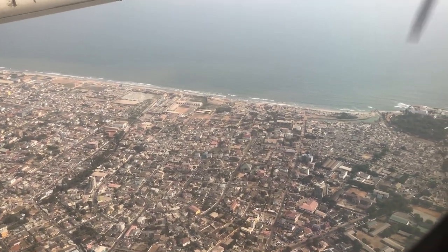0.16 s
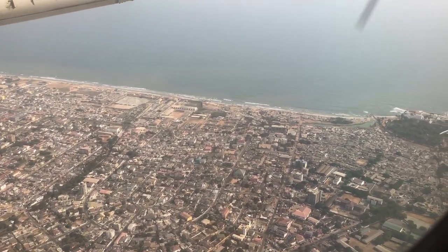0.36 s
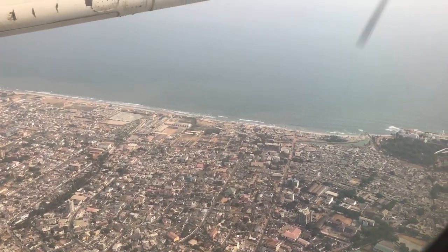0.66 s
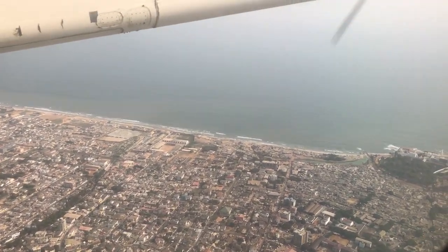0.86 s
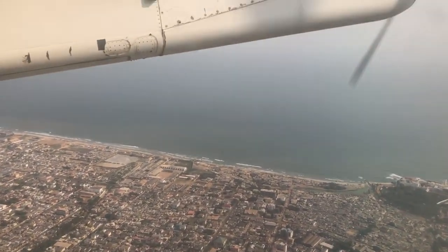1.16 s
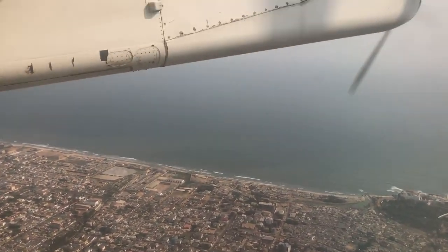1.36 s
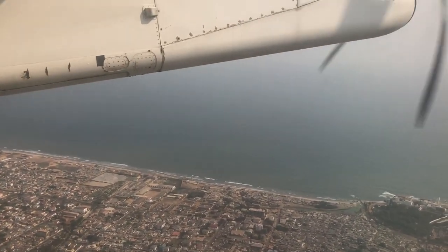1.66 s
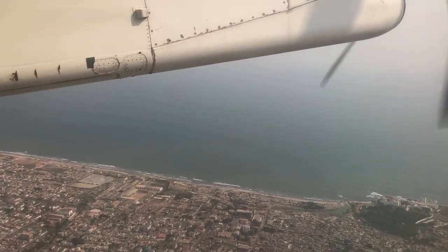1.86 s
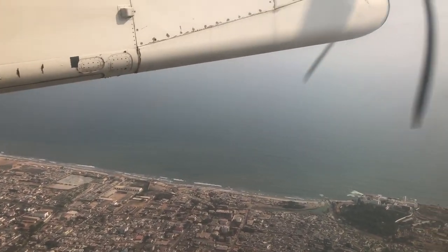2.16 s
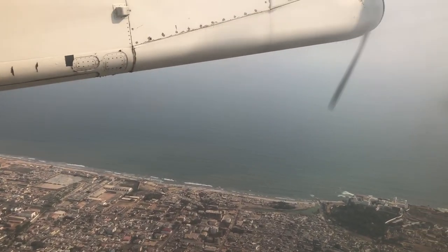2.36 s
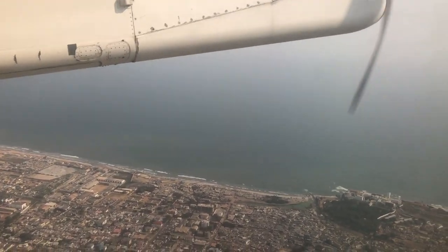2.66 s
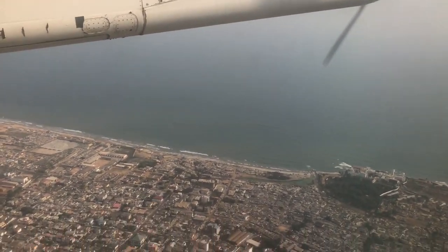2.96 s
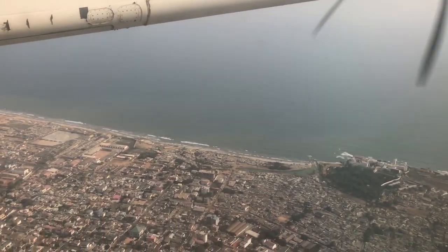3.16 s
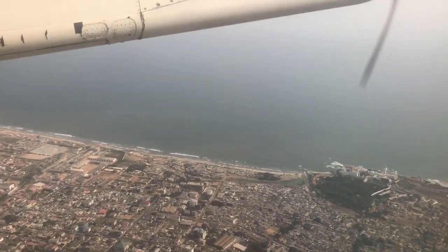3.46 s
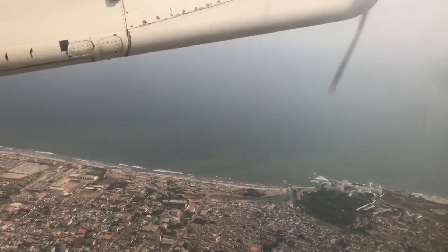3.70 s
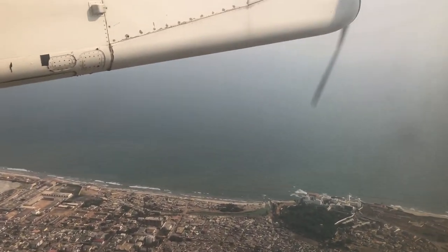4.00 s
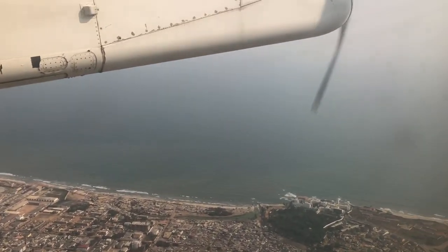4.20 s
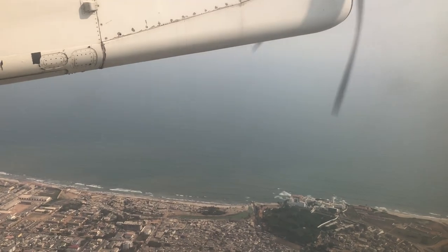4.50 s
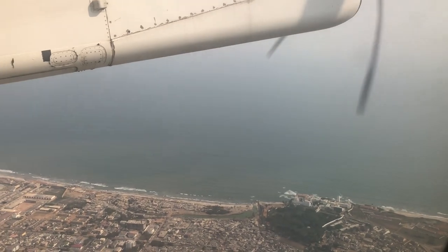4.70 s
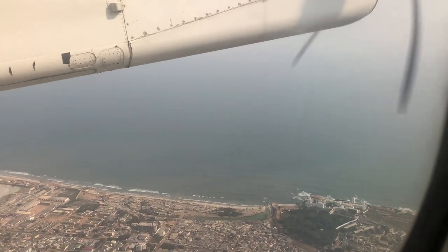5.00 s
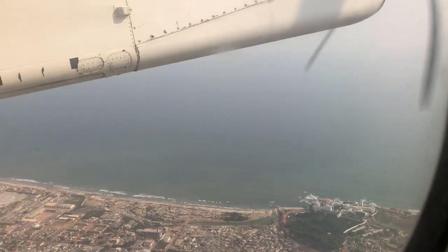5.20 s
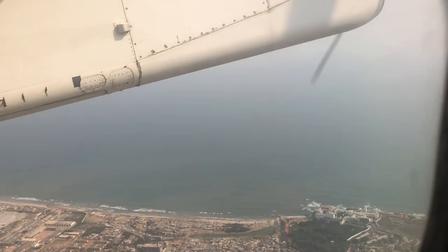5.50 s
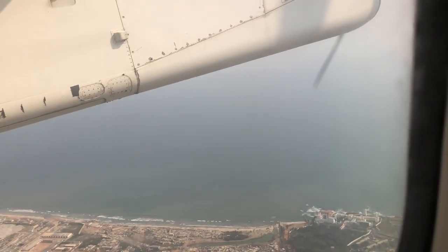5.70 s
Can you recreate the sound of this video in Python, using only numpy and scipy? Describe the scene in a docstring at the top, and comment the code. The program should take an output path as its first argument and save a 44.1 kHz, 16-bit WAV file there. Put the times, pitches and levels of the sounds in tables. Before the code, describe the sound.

Propeller aircraft cabin hum, low and throbbing at first, then thinner and brighter as slipstream roar swells near the window.

```python
"""A propeller drone fills a turboprop cabin at a window seat, winding down a little: blade harmonics, near and far.
The microphone drifts through standing waves: the deep boom fades, then the overtones come forward.
Slipstream is shaped noise, growing toward the window; pane, recess and seal add resonant noise bands.
Accessories hum and whine as sines; trim buzzes in spells as blade-gated noise; soft rustles brush the microphone."""
import sys
import numpy as np
from scipy.fft import rfft, irfft, next_fast_len
from scipy.io import wavfile
from scipy.ndimage import map_coordinates

SR = 44100
rng = np.random.default_rng(int(sys.argv[2]) if len(sys.argv) > 2 else 0)


def generate_wav(signal):
    """Clip the signal to [-1, 1] and save it as 16-bit WAV at the path in sys.argv[1]."""
    frames = np.transpose(np.atleast_2d(signal))
    scaled = np.clip(frames, -1, 1) * 32767
    pcm = np.round(scaled).astype(np.int16)
    wavfile.write(sys.argv[1], SR, pcm)


N = 257982

# microphone's path along the window: time_s, seal_whistle_hz, recess_depth (0-1)
MIC_PATH = [(0, 3850, 0.01), (1.7, 3690, 0.12), (2.4, 3667, 0.48), (3.15, 3746, 0.27), (3.85, 3610, 0.94),
            (4.3, 3575, 1), (4.7, 3610, 0.9), (5.2, 4047, .68), (5.85, 3890, 0.7)]


def amp(db):
    """Decibels to gain."""
    return 10 ** (np.asarray(db) / 20)


def unit(x):
    """Scale to rms 1."""
    return x / np.sqrt(np.mean(x ** 2) + 1e-20)


def times():
    """Time of each sample in seconds."""
    return np.arange(N) / SR


def curves(rows):
    """One value per sample for each column after the time."""
    time_s, *columns = np.transpose(rows)
    return [np.interp(times(), time_s, column) for column in columns]


def wobble(knots_per_s):
    """A smooth random curve through normally distributed knots."""
    knots = rng.standard_normal(1024)
    return map_coordinates(knots, [np.arange(N) * knots_per_s / SR], mode="wrap")


def ease(middle_s, length_s):
    """A smooth move from 0 to 1."""
    u = np.clip((times() - middle_s) / length_s, -0.5, 0.5)
    return 0.5 + 0.5 * np.sin(np.pi * u)


def phase_of(hz):
    """Running phase of a frequency curve."""
    return 2 * np.pi * np.cumsum(hz) / SR


def tone(phase):
    """A sine of rms 1 that starts anywhere in its cycle."""
    return np.sqrt(2) * np.sin(phase + 2 * np.pi * rng.random())


def filtered(x, response):
    """x times a response of frequency, padded against wrap-around."""
    size = next_fast_len(N + SR // 2)
    spectrum = rfft(x, size) * response(np.fft.rfftfreq(size, 1 / SR))
    return irfft(spectrum, size)[:N]


def noise(spectrum):
    """Noise of rms 1 coloured by (Hz, dB) points on a log-frequency axis."""
    point_hz, point_db = np.transpose(spectrum)

    def colour(hz):
        return amp(np.interp(np.log(hz + 1), np.log(point_hz), point_db, right=-120))

    return unit(filtered(rng.standard_normal(N), colour))


def band(centre_hz, width_hz):
    """Noise of rms 1 in one resonance; its gain halves width_hz from the centre."""
    return unit(filtered(rng.standard_normal(N), lambda hz: 1 / (1 + ((hz - centre_hz) / width_hz) ** 2)))


def depth():
    """How far the microphone is inside the window recess, 0 to 1."""
    return curves(MIC_PATH)[1]


def blade_rate(fast_hz=97.6, slow_hz=89.58, throttle_s=0.12, sag_hz_per_s=1.97):
    """Blade passes a second: hold one governed speed, fall steadily, hold the next."""
    return np.clip(fast_hz - sag_hz_per_s * (times() - throttle_s), slow_hz, fast_hz)


def propellers(waver_db=0.2747, far_db=-39, far_db_per_harmonic=2.0, slip_hz=0.35):
    """Blade pulses shake the fuselage; each harmonic fills the cabin with its own standing wave.
    Higher harmonics waver more, and beat more with the far propeller, which runs a hair faster."""
    # multiple, boom_db, node_db, window_db, rise_middle_s, recess_gain_db
    harmonics = [(1, -11.4, -31.5, -18, 2.58, -3.5), (2, -31, -41, -23, 2.13, -4.5),
                 (3, -35.5, -31.5, -23.5, 3.04, 1), (4, -41, -31.5, -24, 3.13, 1.2),
                 (5, -51, -47.5, -47.5, 3, 6), (6, -51.5, -51, -46.5, 2.2, -3),
                 (7, -54.5, -64, -52, 2.8, -1.5), (8, -56, -61.5, -57, 2.7, 2),
                 (9, -61, -64, -47.5, 1.87, -10.5), (10, -66.5, -68, -55.5, 2.9, 7.5)]
    rise_length_s = 1.34  # climb out of the node
    mode_hz, mode_half_width_hz, mode_db = 293, 0.97, 9.8  # cabin air resonance
    blade_hz, inside = blade_rate(), depth()
    boom = 1 - ease(middle_s=1.456, length_s=0.95)  # leaving the boom for a node
    near, far = phase_of(blade_hz), phase_of(blade_hz + slip_hz)
    drone = np.zeros(N)
    for multiple, boom_db, node_db, window_db, rise_middle_s, recess_db in harmonics:
        k = round(multiple)
        window = ease(rise_middle_s, rise_length_s)
        beyond_boom = (1 - window) * amp(node_db) + window * amp(window_db)
        standing = boom * amp(boom_db) + (1 - boom) * beyond_boom
        lift_db = mode_db / (1 + ((k * blade_hz - mode_hz) / mode_half_width_hz) ** 2)
        level_db = lift_db + recess_db * inside + waver_db * k * wobble(4)
        pair = tone(k * near) + amp(far_db + far_db_per_harmonic * k) * tone(k * far)
        drone += standing * amp(level_db) * pair
    return drone


def accessories(start_hz=85.34, end_hz=84.66, waver_db=0.5, drift_hz=1.1):
    """An engine-driven pump hums at multiples of its nearly steady shaft rate; gearbox and turbine whine above."""
    # shaft_multiple, level_db
    pump_harmonics = [(4, -35), (5, -44.5), (6, -49), (8, -53), (9, -60), (10, -60), (12, -61.5)]
    # pitch_hz, level_db
    whine_tones = [(2045, -77), (2397, -78), (2488, -77), (2918, -85)]
    shaft = phase_of(np.linspace(start_hz, end_hz, N) + 0.079 * wobble(3))
    total = np.zeros(N)
    for multiple, level_db in pump_harmonics:
        total += amp(level_db + waver_db * wobble(3.6)) * tone(round(multiple) * shaft)
    for pitch_hz, level_db in whine_tones:
        whine = tone(phase_of(pitch_hz + drift_hz * wobble(3.7)))
        total += amp(level_db + waver_db * wobble(4.6)) * whine
    return total


def air_layer(spectrum, far_db, window_gain_db, flutter_db, knots_per_s):
    """Coloured noise that flutters and grows as the microphone nears the window."""
    level_db = far_db + window_gain_db * ease(middle_s=2.045, length_s=0.8)
    return amp(level_db + flutter_db * wobble(knots_per_s)) * noise(spectrum)


def near_window(x, pane_db=-17, frame_db=-21, pane_s=0.000205, frame_s=0.00034, shorten=0.35, dull_hz=9000):
    """Two very short, dull echoes, off pane and frame, comb the air noise; paths shorten inside the recess."""
    path = 1 - shorten * depth()
    dull = filtered(x, lambda hz: 1 / (1 + (hz / dull_hz) ** 10))
    pane = map_coordinates(dull, [np.arange(N) - pane_s * path * SR])
    frame = map_coordinates(dull, [np.arange(N) - frame_s * path * SR])
    return x + amp(pane_db) * pane + amp(frame_db) * frame


def cabin(x, echo_db=-10.0, drift_s=0.00008, count=14):
    """Weak echoes from seats, wall and ceiling ripple the spectrum; each path wanders as the microphone moves."""
    echoes = np.zeros(N)
    for delay_s in rng.uniform(0.0008, 0.012, count):
        path_s = delay_s + drift_s * wobble(1.0)
        echoes += map_coordinates(x, [np.arange(N) - path_s * SR], order=2)
    wet = amp(echo_db)
    return (x + wet * echoes / np.sqrt(count)) / np.hypot(1, wet)


def slipstream(flutter_db=0.12):
    """Turbulence on the skin: a low roar through the panels, a rush through the window, a smooth hiss."""
    # each: frequency_hz, relative_db_per_hz
    roar_spectrum = [(22, -38), (38, -32.5), (47, -25), (56, -6), (84, -6), (122, 1), (165, -3.5),
                     (238, -8.5), (297, -3.5), (322, -6), (372, -4), (450, -15), (510, -16), (620, -25.5),
                     (900, -57)]
    rush_spectrum = [(500, -36), (690, 0.5), (790, 0), (930, -4.5), (1000, -4.5), (1180, -5.5), (1410, -3),
                     (1560, -8.5), (2100, -13), (2700, -21.5), (3050, -19.5), (4000, -22.5), (5000, -45)]
    hiss_spectrum = [(3000, -25.5), (4400, -0.5), (5500, 2), (6200, 0), (7500, 0.5), (8300, -3),
                     (10000, -5), (11500, -8.5), (14000, -8.5), (15700, -9)]
    roar = air_layer(roar_spectrum, -27, 5.4, flutter_db, knots_per_s=13)
    rush = air_layer(rush_spectrum, -49.5, 4.7, flutter_db, knots_per_s=12)
    hiss = air_layer(hiss_spectrum, -66.3, 3.1, flutter_db, knots_per_s=11)
    return roar + near_window(rush + cabin(hiss))


def pane_ring(centre_hz=848, width_hz=52):
    """One broad resonance of the inner pane, driven by the slipstream."""
    # time_s, level_db
    ring_levels = [(0, -51.5), (1.5, -50.5), (2.4, -44.5), (3.8, -42.5), (5.85, -47)]
    return amp(curves(ring_levels)[0]) * band(centre_hz, width_hz)


def draught(outside_db=-72.0, recess_db=21):
    """Air moving in the hollow of the window recess, and its low boom, both louder deep inside."""
    # frequency_hz, relative_db_per_hz
    recess_spectrum = [(1200, -26), (1700, 2.5), (2100, 2), (2700, -3.5), (2920, -0.5), (3200, -3),
                       (3600, -4.5), (3950, -12), (4500, -10), (5500, -23.5)]
    inside = depth()
    boom = amp(-40 + 11 * inside) * band(centre_hz=158.5, width_hz=23.5)
    return amp(outside_db + recess_db * inside) * noise(recess_spectrum) + boom


def trim_buzz(sharpness=3.6, sizzle_db=-4.0, uneven_db=0.5, release_s=0.22):
    """A loose panel edge chatters once for each blade pulse, in spells that build up, hold and die away."""
    # start_s, length_s, attack_s, level_db, centre_hz
    spells = [(0, 1.2, 0.0091, -72.5, 6900), (1.399, .8, .5, -76.5, 7550),
              (5.165, 0.78, 0.027, -70.5, 7600)]
    t, buzz = times(), np.zeros(N)
    pulses = np.exp(sharpness * (np.cos(phase_of(blade_rate())) - 1))
    contact = pulses * amp(uneven_db * wobble(40))
    sizzle = amp(sizzle_db) * band(centre_hz=11000, width_hz=4000)
    for start_s, length_s, attack_s, level_db, centre_hz in spells:
        attack = np.clip((t - start_s) / attack_s, 0, 1)
        release = np.exp(-np.maximum(t - start_s - length_s, 0) / release_s)
        chatter = unit(contact * (band(centre_hz, width_hz=490) + sizzle))
        buzz += amp(level_db) * attack * release * chatter
    return buzz


def brushes(grain_db=2.5):
    """Faint brushes against the microphone: short, soft, grainy and very high rustles."""
    # middle_s, level_db, half_length_s, centre_hz
    rustles = [(0.435, -65, .012, 10000), (0.87, -68, .018, 9800), (2.555, -70, .007, 11000),
               (2.858, -66, .011, 11500), (3.098, -61, .013, 11000), (5.0, -66, .05, 13500)]
    t, total = times(), np.zeros(N)
    for middle_s, level_db, half_length_s, centre_hz in rustles:
        swell = np.exp(-0.5 * ((t - middle_s) / half_length_s) ** 2)
        total += amp(level_db) * swell * band(centre_hz, width_hz=2400)
    return total * unit(amp(grain_db * wobble(400)))


def window_seal(width_hz=165, far_db=-69.5, gain_db=8, recess_db=1):
    """A whistling narrow band of air noise whose pitch shifts as the microphone moves along the pane."""
    whistle_hz, inside = curves(MIC_PATH)
    phase = phase_of(whistle_hz)
    level_db = far_db + gain_db * ease(middle_s=2.5, length_s=1.6) + recess_db * inside
    # two low noises in quadrature centre the band on the moving pitch
    whistle = band(0, width_hz) * np.cos(phase) + band(0, width_hz) * np.sin(phase)
    return amp(level_db) * whistle


def scene():
    """Everything heard at the window seat."""
    engines = propellers() + accessories()
    air = slipstream() + pane_ring() + cabin(draught() + window_seal())
    return (engines + air + trim_buzz() + brushes())[None]


def record(dry, fade_in_s=0.003, top_hz=15720):
    """A short linear fade-in, then a sharp cut of everything above the band limit."""
    opening = np.minimum(times() / fade_in_s, 1)
    return filtered(dry[0] * opening, lambda hz: hz < top_hz)[None]


dry = scene()
out = record(dry)
generate_wav(out)
```